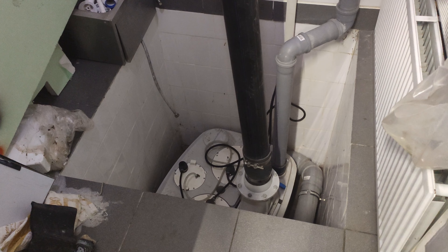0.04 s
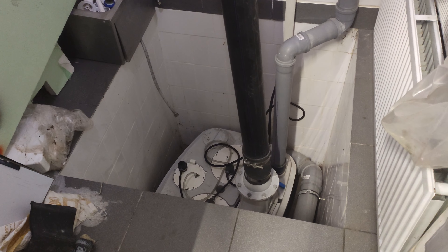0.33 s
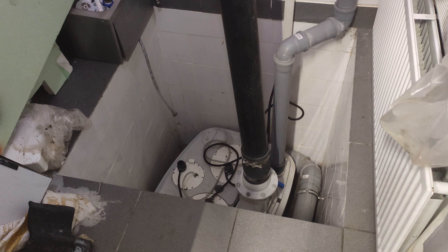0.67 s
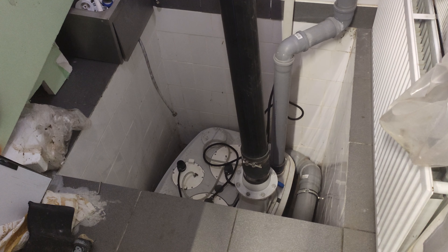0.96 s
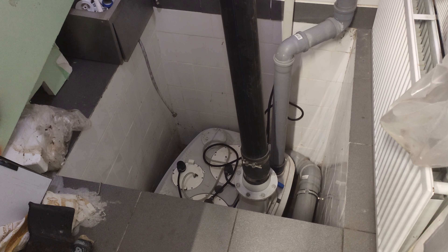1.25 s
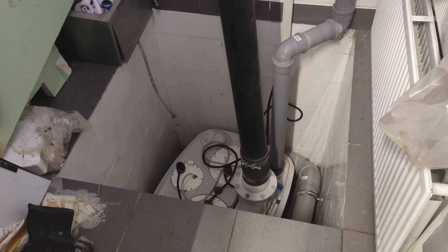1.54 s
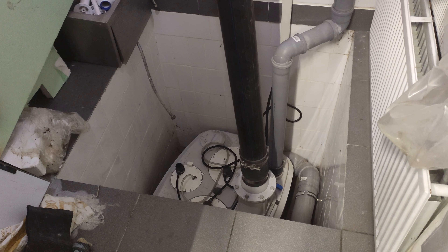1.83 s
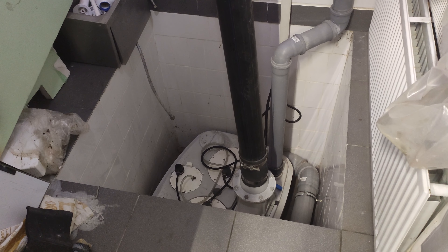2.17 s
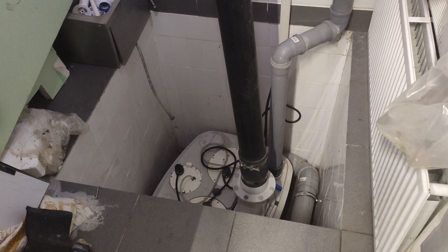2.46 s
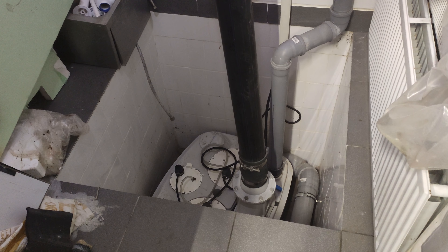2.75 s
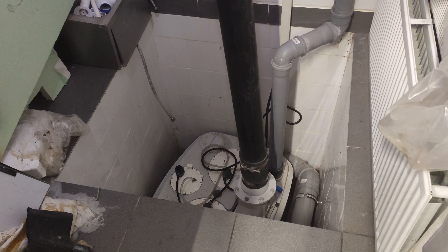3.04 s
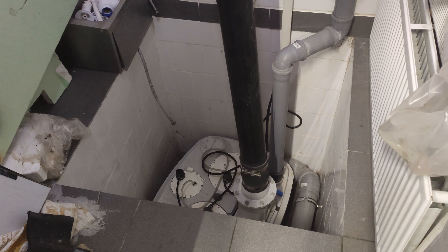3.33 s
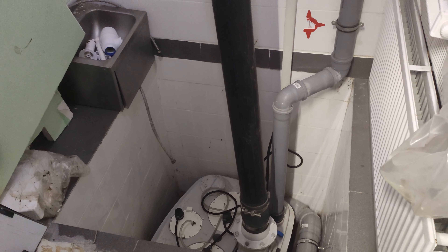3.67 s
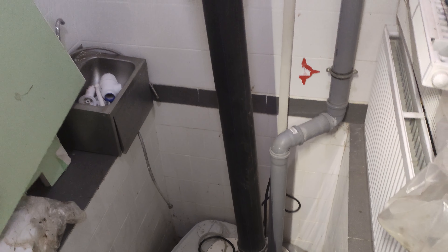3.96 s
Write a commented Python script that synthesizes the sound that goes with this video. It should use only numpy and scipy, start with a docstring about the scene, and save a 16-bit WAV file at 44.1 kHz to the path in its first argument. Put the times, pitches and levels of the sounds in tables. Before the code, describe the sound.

Heard from above a tiled pit, water rushes through a pump unit after a stretch of steady hiss and faint hum. The flow starts suddenly, rumbling and gurgling while the pipes ring and the splashing grows brighter.

```python
"""Water churns through a sewage pump unit in a tiled pit in a small utility room, heard from above. Before it
moves, a steady hiss sits on the left over a faint hum, with one dry tick and a brief whirr. Then countless tiny
impacts of water make a hollow rumble and splashing that grows brighter. The flow sets the pipes ringing and
droning, trapped air gulps, and a long pipe booms deep below it all."""
import sys
import numpy as np
from scipy import signal
from scipy.fft import rfft, irfft
from scipy.io import wavfile

SR = 44100
rng = np.random.default_rng(int(sys.argv[2]) if len(sys.argv) > 2 else 0)


def dump_mix(stems):
    """Bounce the given channels to the path in sys.argv[1] as a 16-bit WAV at rate SR."""
    frames = np.atleast_2d(stems).T  # one column per channel
    limited = np.clip(frames, -1, 1)  # hard clip at full scale
    pcm = np.round(limited * 32767).astype(np.int16)
    wavfile.write(sys.argv[1], SR, pcm)


N = 176400
T, HZ = np.arange(N) / SR, np.fft.rfftfreq(N, 1 / SR)

# strength of the flow: time_s, level_db
FLOW_LEVEL = [(2.828, -36), (2.84, -25), (2.89, -9), (2.95, -4.5), (3.06, -6), (3.16, -1.5), (3.3, -2),
              (3.45, -1), (3.62, -4), (3.72, -0.5), (3.87, -1), (4, 0.5)]
# strength of the churning: time_s, level_db
CHURN_LEVEL = [(2.83, -20.5), (2.87, -21), (2.89, -12.5), (2.92, -11), (2.935, -8.5), (2.99, -4),
               (3.07, -4.5), (3.12, 0.5), (3.2, 3), (3.33, -1.5), (3.41, -0.5), (3.6, -1), (3.72, 0),
               (3.85, -3.5), (4, 1.5)]
# how much louder water and ringing are on the left: frequency_hz, difference_db
LEFT_LEAN = [(50, 2.3), (300, -0.5), (550, 2.5), (1200, 1), (2500, 3), (4000, 7.5), (5500, 10.5),
             (6600, 12.5), (8000, -1), (14000, 2)]


def amp(db):
    """Turns decibels into a number to multiply by."""
    return 10 ** (np.asarray(db) / 20)


def unit(x):
    """Scales a signal to an average strength (rms) of 1."""
    return x / np.sqrt(np.mean(x ** 2) + 1e-20)


def spectrum(points):
    """Joins a table's points into a curve over all frequencies, on a log axis."""
    hz, value = np.transpose(points)
    return np.interp(np.log(HZ + 1), np.log(hz + 1), value)


def level(points):
    """Joins (time, decibel) points into a volume curve, silent before the first."""
    s, db = np.transpose(points)
    return amp(np.interp(T, s, db)) * (T > s[0])


def bump(centre_s, length_s):
    """A smooth rise and fall around one moment."""
    return np.exp(-(2 * (T - centre_s) / length_s) ** 2)


def wander(rate_hz):
    """A smooth random wobble; a higher rate makes it quicker."""
    keep_slow = np.exp(-(HZ / rate_hz) ** 2) * (HZ > 0)
    return unit(irfft(rfft(rng.standard_normal(N)) * keep_slow, N))


def tone(hz, waver, rate_hz):
    """A pure note whose pitch wobbles by about the fraction `waver`."""
    pitch_hz = hz * (1 + waver * wander(rate_hz))
    return np.sin(2 * np.pi * np.cumsum(pitch_hz) / SR)


def noise():
    """Two unrelated white noises."""
    return rng.standard_normal((2, N))


def impacts(per_s, spread_db):
    """Two streams of random clicks of uneven size."""
    size = amp(spread_db * np.minimum(rng.exponential(1, (2, N)), 4))
    return unit(size * np.sign(noise()) * (rng.random((2, N)) < per_s / SR))


def at_mics(drive, gain, lean_db=0):
    """Shapes the tone of two noises and blends them into left and right, the left slightly later."""
    # how alike the two microphones sound: frequency_hz, likeness (1 = the same)
    likeness = [(40, 1), (160, 0.98), (380, 0.82), (700, 0.66), (1000, 0.33), (1600, 0.38), (2600, 0.026),
                (14000, 0.3)]
    left_lag_s = .00018
    first, second = rfft(drive)
    alike = np.clip(spectrum(likeness), -1, 1)
    mid, side = first * np.sqrt(1 + alike), second * np.sqrt(1 - alike)
    left = (mid + side) * amp(lean_db / 2) * np.exp(-2j * np.pi * HZ * left_lag_s)
    right = (mid - side) * amp(-lean_db / 2)
    return unit(irfft(np.array([left, right]) * gain, N))


def ringing(notes):
    """Random swirling keeps notes ringing; the smaller the width, the purer the note."""
    return sum(amp(db) * at_mics(noise(), 1 / (1 + 1j * (HZ - hz) / width) ** 2, spectrum(LEFT_LEAN))
               for hz, width, db in notes)


def hiss():
    """Tiny clicks, too many to tell apart, blur into a steady, slightly fluttering hiss."""
    # tone of the hiss on each side: frequency_hz, relative_db
    left_colour = [(300, -36), (1200, -22.5), (1900, -16), (2900, -13.5), (3600, -8), (4700, -5),
                   (5600, -1.5), (6400, -1), (6850, -7), (7400, -18.5), (8600, -28), (10500, -26),
                   (14000, -40)]
    right_colour = [(300, -13.5), (1200, -9.5), (1900, -4), (3000, -4.5), (3900, -0.5), (5200, 0),
                    (5950, 2), (6700, -5), (8500, -8), (11000, -12), (14000, -22)]
    left_clicks, right_clicks = impacts(per_s=14000, spread_db=1.5)
    left = amp(-38) * unit(irfft(rfft(left_clicks) * amp(spectrum(left_colour)), N))
    right = amp(-50.5) * unit(irfft(rfft(right_clicks) * amp(spectrum(right_colour)), N))
    flutter_db = 0.61 * wander(rate_hz=47)
    return np.array([left, right]) * amp(flutter_db)


def room():
    """Faint room noise and hums, which sink just before the flow starts."""
    # tone of the room noise: frequency_hz, relative_db
    colour = [(20, -19), (55, -6), (78, -9), (95, -1.5), (125, -5.5), (156, -2.5), (185, -6.5), (270, -6),
              (318, -3.5), (370, 0), (500, 0), (800, -1.5), (1200, -7.5), (2500, -18)]
    # notes ringing in the room: pitch_hz, width_hz, level_db
    hums = [(150, 6.9, -74), (501.6, 4.5, -72), (642, 3.1, -75.5)]
    # rise and fall of both: time_s, change_db
    loudness = [(0, 0), (1.2, 0.5), (1.9, -1), (2.6, -.5), (2.7, -3), (4, -7)]
    background = amp(-59) * at_mics(noise(), amp(spectrum(colour)), lean_db=0.5)
    return (background + ringing(hums)) * level(loudness)


def idle_hum():
    """A quiet, clear hum that fades before the water moves."""
    # strength of the hum: time_s, level_db
    loudness = [(0, -64), (.2, -68), (.5, -70.5), (2.55, -72), (2.68, -86)]
    return level(loudness) * tone(320.4, waver=0.0053, rate_hz=8)


def whistles():
    """Brief, fuzzy whistles rise out of the hiss."""
    # one whistle a row: centre_s, length_s, pitch_hz, width_hz, level_db
    swells = [(1.272, 0.046, 3320, 380, -45.5), (2.422, 0.034, 4100, 450, -47),
              (2.632, 0.11, 3330, 380, -48)]
    return sum(ringing([(hz, width, db)]) * bump(s, length) for s, length, hz, width, db in swells)


def tick():
    """One dry tick at the left microphone: a short push and a very brief ring."""
    start_s, push_s, ring_hz, decay_s = 1.41576, .000058, 5500, .0006
    t = T - start_s
    after = np.maximum(t, 0)
    push = -amp(-13.8) * np.exp(-(t / push_s) ** 2)
    ring = amp(-16) * np.exp(-after / decay_s) * np.sin(2 * np.pi * ring_hz * after)
    click = signal.lfilter(*signal.butter(2, [270, 10000], "band", fs=SR), push + ring)
    return np.outer([1, 0], click)


def whirr():
    """A few wobbling notes swell briefly just before the flow starts."""
    # notes of the whirr: pitch_hz, level_db
    notes = [(482, -66), (501, -61), (662, -67)]
    chord = sum(amp(db) * tone(hz, waver=0.0248, rate_hz=39.5) for hz, db in notes)
    return chord * bump(centre_s=2.79, length_s=0.22)


def water(colour, per_s, spread_db, surge_db, surge_hz):
    """Many tiny impacts of water that come in uneven waves."""
    hits = impacts(per_s, spread_db) * amp(surge_db * wander(surge_hz))
    return at_mics(hits, amp(spectrum(colour)), spectrum(LEFT_LEAN))


def surging():
    """A volume curve that lifts briefly as each surge of water passes through the pipe."""
    # one surge a row: centre_s, length_s, lift_db
    surges = [(3.058, 0.029, 3.5), (3.157, 0.023, 0), (3.238, 0.022, 2.5), (3.405, 0.027, 2.5),
              (3.462, .025, 4.5), (3.695, .025, 3.5), (3.772, .035, 3), (3.836, 0.016, 5),
              (3.868, 0.016, 5), (3.903, .018, 0.5), (3.992, 0.027, 3)]
    return amp(sum(db * bump(s, length) for s, length, db in surges))


def rushing_water():
    """Water runs through the unit: low rumble and ringing pipes, churning above, splashing on top."""
    # tone of each layer of water: frequency_hz, relative_db
    rumble_colour = [(25, -40), (95, -29), (125, -10.5), (162, -3.5), (185, -6.5), (230, 1.5), (275, 3),
                     (330, 2), (400, -0.5), (520, -3), (800, -28), (2000, -61)]
    churn_colour = [(200, -14.5), (420, -2.5), (540, 1), (650, -1.5), (760, -0.5), (880, -1.5), (1050, -3),
                    (1350, -6.5), (1700, -13), (3000, -12.5), (7000, -50)]
    splash_colour = [(400, -17), (1200, 4), (1800, 2), (2600, 2), (3600, 2.5), (5200, 0.1), (6300, -2.5),
                     (7300, -14.5), (8800, -20.5), (11500, -23.5), (14000, -30)]
    # strength of the splashing: time_s, level_db
    splash_level = [(2.828, -24), (2.837, -14), (2.915, -22), (2.935, -10.5), (3.04, -15.5), (3.16, -6.5),
                    (3.36, -9.5), (3.47, -5), (3.64, -5), (3.79, 0.5), (3.87, 0.1), (4, -4)]
    rumble = amp(-36) * water(rumble_colour, per_s=2600, spread_db=2, surge_db=-0.2, surge_hz=25)
    churn = amp(-36) * water(churn_colour, per_s=3400, spread_db=2.5, surge_db=1.0, surge_hz=35)
    splash = amp(-33) * water(splash_colour, per_s=5000, spread_db=2.0, surge_db=0.45, surge_hz=45)
    body = (rumble * level(FLOW_LEVEL) + pipes()) * surging()
    return body + churn * level(CHURN_LEVEL) + splash * level(splash_level)


def pipes():
    """The pipes' low notes ring from the first push; the higher ones join as the water churns."""
    # notes of the pipes: pitch_hz, width_hz, level_db
    notes = [(161, 11, -61), (228.6, 5.6, -48), (243, 9.4, -46.5), (324, 8.1, -47), (351.5, 8.2, -54),
             (374, 12.5, -46.5), (424.6, 13, -48.5), (471.7, 6.7, -47.5), (553, 4.2, -45.5),
             (611, 8.4, -48.5), (705, 8.6, -47.5), (1045, 4.7, -53.5), (1173, 13, -57.5),
             (1445.5, 11, -52.5)]
    split_hz = 450
    return sum(ringing([(hz, width, db)]) * level(CHURN_LEVEL if hz > split_hz else FLOW_LEVEL)
               for hz, width, db in notes)


def drone():
    """Air and water in the pipe sing one rough, hollow note that climbs in pitch."""
    # path of the note: time_s, pitch_hz, level_db
    path = [(2.83, 261, -60), (2.86, 271.6, -60), (2.92, 284, -49.5), (3.2, 280, -51), (3.37, 298.1, -49),
            (3.41, 314, -36.5), (3.55, 326, -33), (3.63, 328.3, -39), (3.71, 333, -37.5), (3.859, 350, -33),
            (4, 335.3, -35)]
    s, hz, db = np.transpose(path)
    note = tone(np.interp(T, s, hz), waver=0.0472, rate_hz=84)
    flutter = 1 + 0.43 * wander(rate_hz=85)
    return level(np.transpose([s, db])) * surging() * flutter * note


def deep_pipe():
    """The flow sets a long pipe ringing in two deep notes, and a boom builds up."""
    # deep notes of the long pipe: pitch_hz, width_hz, level_db
    notes = [(37.3, 2.4, -56.5), (62.2, 5.5, -60.5)]
    # growth of the boom: time_s, change_db
    build_up = [(2.85, -22), (3.0, -9), (3.13, -3), (3.28, 6), (3.55, -0.5), (4, 1)]
    return ringing(notes) * level(build_up)


def gulps():
    """Pockets of trapped air each sound a short, wobbling note."""
    # one gulp a row: centre_s, length_s, pitch_hz, level_db
    pockets = [(3.015, 0.051, 488.5, -35), (3.168, 0.042, 420, -34), (3.303, 0.066, 250, -28.5),
               (3.323, 0.06, 62, -43), (3.41, 0.098, 549.6, -35.5), (3.44, 0.084, 300.5, -33),
               (3.735, 0.12, 1190, -40), (3.968, 0.051, 834, -42)]
    return sum(amp(db) * bump(s, length) * tone(hz, waver=0.0389, rate_hz=70.4)
               for s, length, hz, db in pockets)


def walls(sound, echo_db):
    """Sound bounces off the tiles, giving each microphone its own short echo."""
    fade_s, thin_below_hz = 0.35, 800  # the echo falls 60 dB in fade_s and has little bass
    tail = noise() * np.exp(-np.log(1000) * T / fade_s)
    echo_gain = amp(echo_db) * HZ ** 2 / (HZ ** 2 + thin_below_hz ** 2)
    echo = echo_gain * rfft(tail / np.linalg.norm(tail[0]))
    response = irfft((1 + echo) / np.sqrt(1 + echo_gain ** 2), N)
    return signal.fftconvolve(sound, response[:, :SR // 2], axes=1)[:, :N]


def scene():
    """All sources together; the hiss, whistles and rushing water echo off the tiles."""
    hissing = walls(hiss() + whistles(), echo_db=-9)
    flowing = walls(rushing_water(), echo_db=-4.5) + gulps() + drone() + deep_pipe()
    return hissing + flowing + room() + idle_hum() + whirr() + tick()


def record(dry):
    """Trims away the deepest bass and the highest treble."""
    low_hz, high_hz = 32, 14200
    trimmed = signal.sosfilt(signal.butter(6, low_hz, "high", fs=SR, output="sos"), dry)
    treble_cut = signal.firwin(511, high_hz, window=("kaiser", 9), fs=SR)
    return signal.oaconvolve(trimmed, treble_cut[None], "same")


dry = scene()
out = record(dry)
dump_mix(out)
```